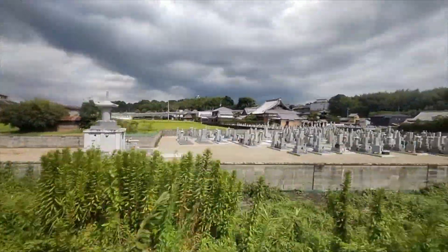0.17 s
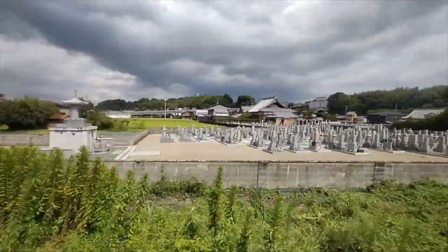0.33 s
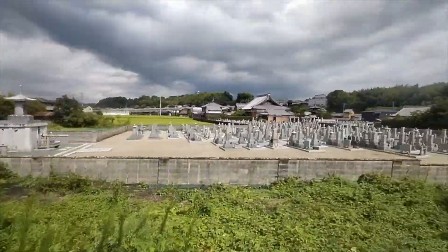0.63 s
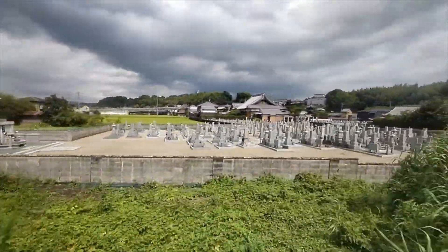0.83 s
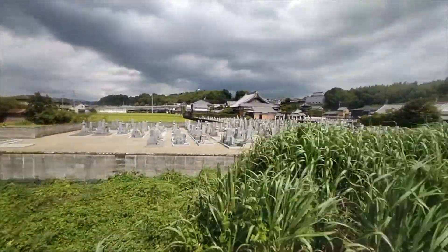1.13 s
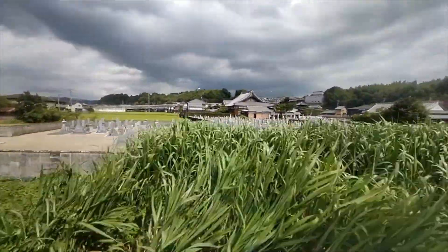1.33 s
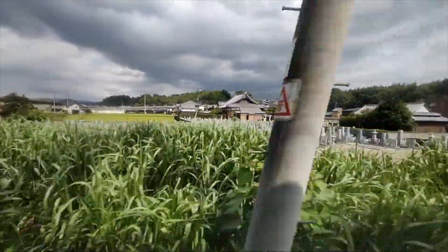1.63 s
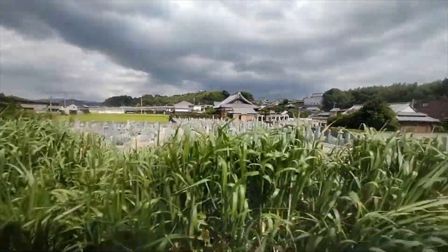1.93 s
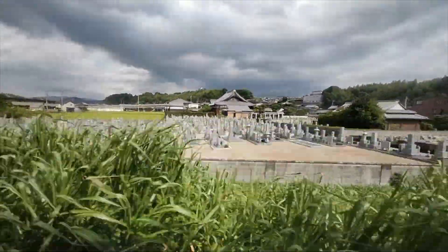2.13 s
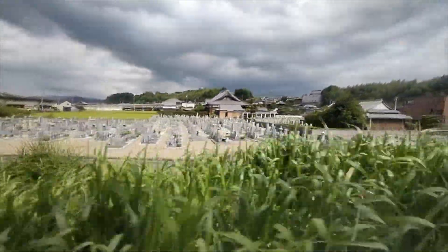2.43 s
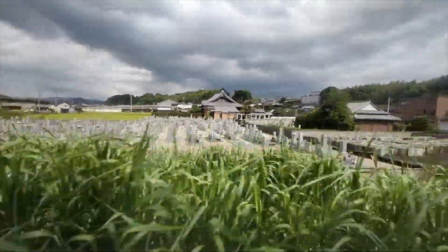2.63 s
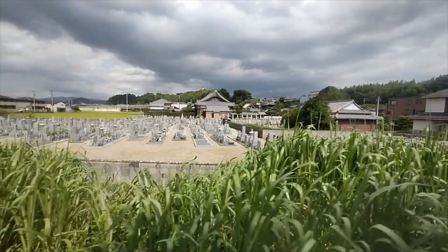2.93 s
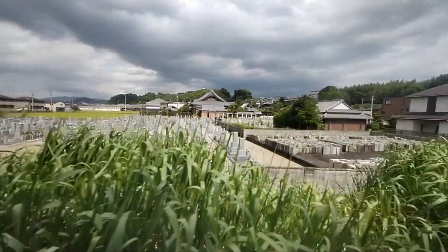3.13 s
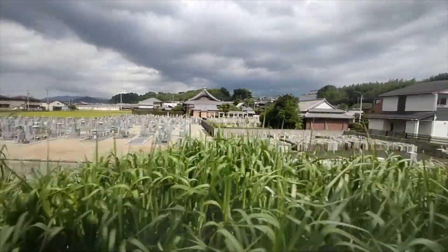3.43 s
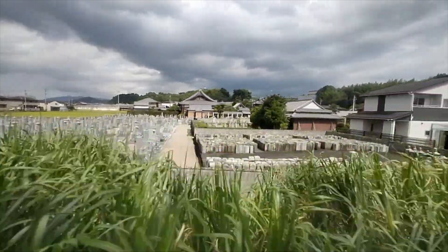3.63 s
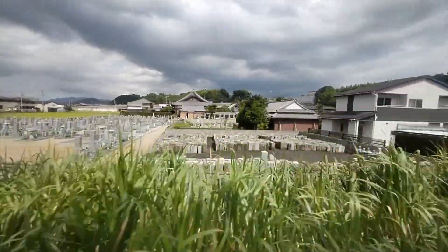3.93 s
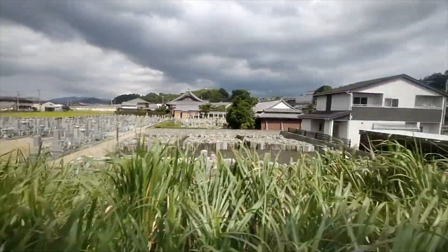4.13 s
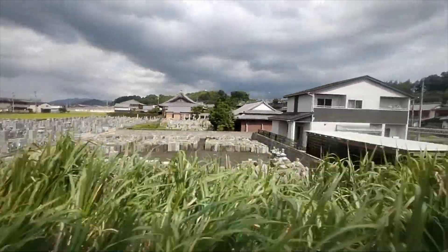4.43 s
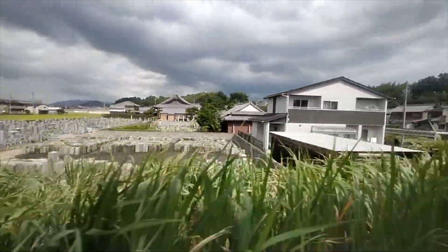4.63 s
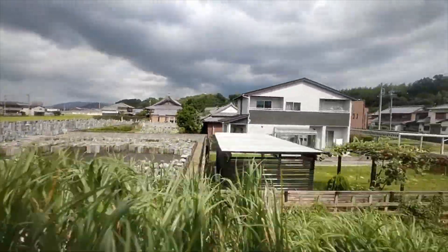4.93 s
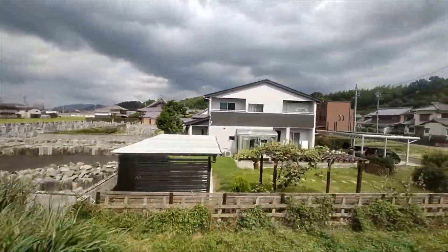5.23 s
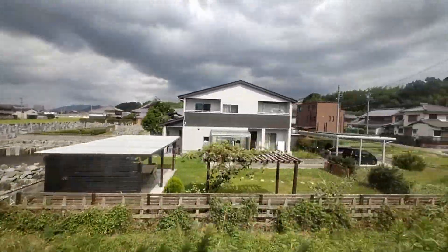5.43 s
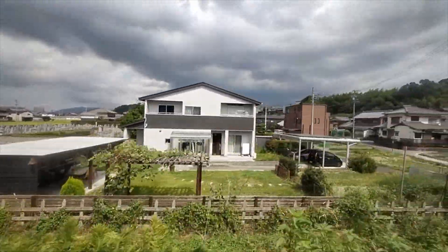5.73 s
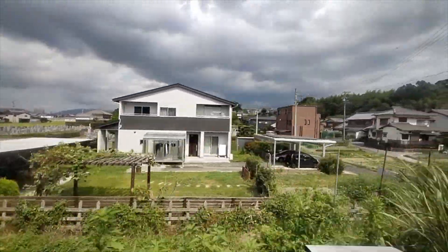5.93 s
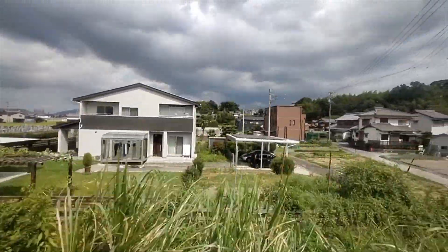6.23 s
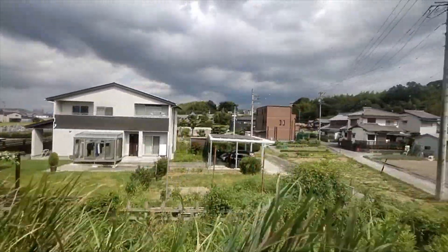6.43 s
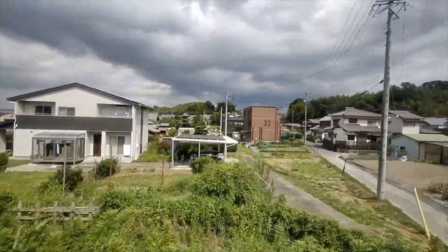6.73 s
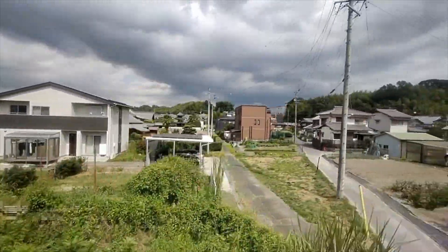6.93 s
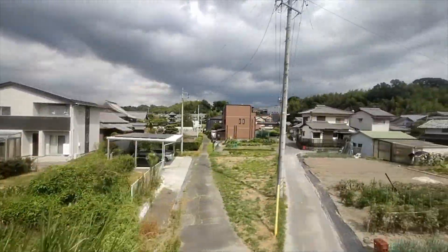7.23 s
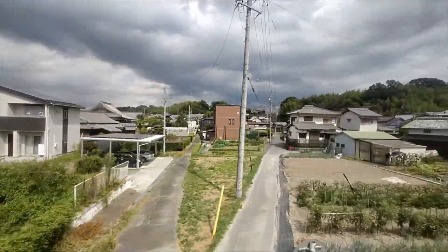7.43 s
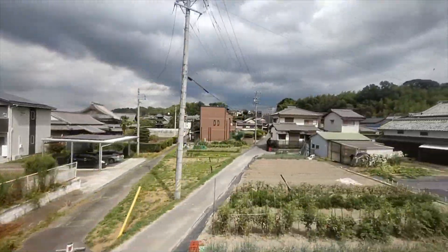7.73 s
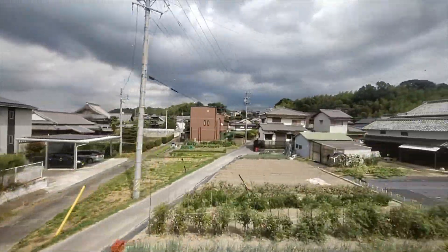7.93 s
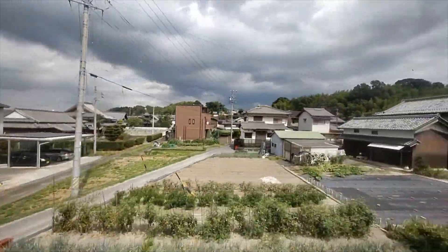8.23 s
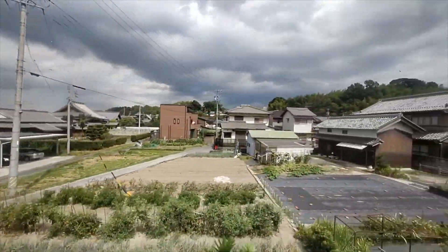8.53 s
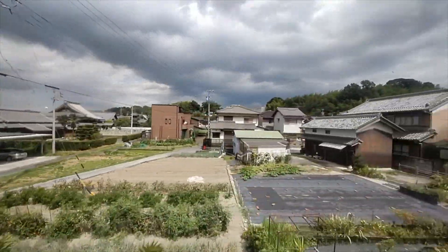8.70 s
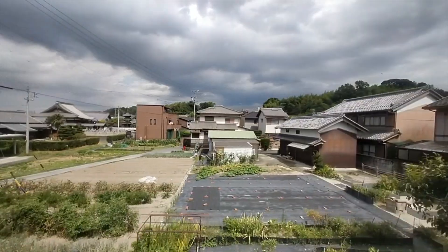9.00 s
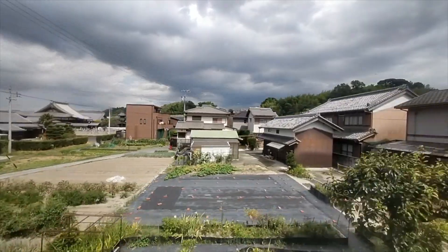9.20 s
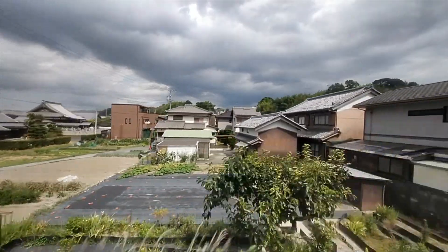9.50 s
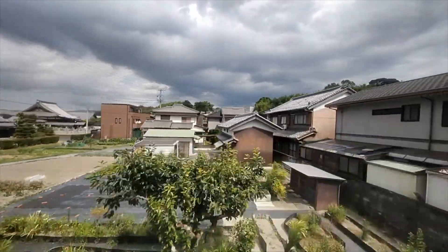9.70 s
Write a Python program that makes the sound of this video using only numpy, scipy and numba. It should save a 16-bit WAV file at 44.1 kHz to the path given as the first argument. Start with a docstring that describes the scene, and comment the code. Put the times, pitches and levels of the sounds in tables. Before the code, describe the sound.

Inside an electric train carriage slowing slightly, heard by a phone near the window. Throughout, dense low rolling rumble with a softer midrange roar swells and flickers, over a wavering hum near 50 Hz and an almost buried thin high whine. From 0.25 to 4.1 s a loose panel knocks repeatedly, deep, hollow and double-bouncing, heavy at 0.5, 1.5, 2.2 and 3.5. Body shakes and rattles crowd 0.5-0.8, 1.47 and 4.0. Metallic wheel clacks strike at 0.4, 1.2, 2.25-2.4, 3.2, then hard at 4.13-4.3. The hum is strongest near 3.8; after 4.6 the ride is calmer, with a knock at 5.2. Strong paired clacks come at 6.06 and 6.24, with knocks at 5.9-6.4, then clacks at 7.1, 7.3, 8.05, 8.2. Bright tiny ticks gather around 2.2-3.2 and 7.5-8.4, leaning left. Knocks and small clacks cluster from 8.65 to 9.4; rumble continues to the end, about 9.9.

```python
"""Inside an electric train carriage as it slows slightly

Heard by a phone near the window. Rolling noise (coloured bands plus wheel modes) fills the car over a
wavering low hum and faint inverter lines (sines). Wheels clack over rail joints (noise crashes, ringing
modes, body and panel shakes), a loose panel knocks in its frame as the body sways (bouncing pushes into
decaying modes), and trim ticks close to the phone (short bright noise)."""
import sys
import numpy as np
from scipy import signal
from scipy.fft import rfft, irfft
from scipy.io import wavfile
from scipy.ndimage import uniform_filter1d
from numba import njit

SR = 44100
rng = np.random.default_rng(int(sys.argv[2]) if len(sys.argv) > 2 else 0)


def store_wav(level_fs):
    """Save 16-bit WAV to argv[1]."""
    pcm = np.round(np.clip(np.atleast_2d(level_fs), -1, 1) * 32767)
    wavfile.write(sys.argv[1], SR, pcm.T.astype(np.int16))


N = 434826
T = np.arange(N) / SR
LEFT_LAG_S = 0.00015  # shared sound reaches the left port late

# wheel and rail modes: mode_hz, width_hz, relative_db
WHEEL = [(501, 40, -10), (953, 40, -5), (1106, 45, -9), (1340, 30, -15), (1725, 30, -23), (1893, 30, -14.5),
         (1960, 30, -17), (2218, 40, -15), (2320, 40, -17), (2630, 60, -31), (2975, 40, -28)]
# blows through the floor: start_s, crash_db, then ring_db of six mode groups, lowest first
CLACKS = [(.056, -47.5, -49, -47, -54, -56, -53, -61), (.387, -32.5, -46, -45.5, -44, -45, -37, -51),
          (0.994, -38.5, -49, -48, -59, -59, -60, -63), (1.224, -29, -44, -38, -40, -60, -65, -60),
          (2.243, -33.5, -42, -36, -53, -41, -43, -54), (2.268, -39, -45, -36, -50, -50, -39, -58),
          (2.411, -36, -37, -35, -50, -38, -38.5, -54), (3.195, -40.5, -52, -37, -46, -49, -61, -66),
          (3.342, -40.5, -50, -47, -55, -59, -59, -61), (4.133, -27.5, -28, -27, -41, -32, -37, -45),
          (4.299, -34.5, -44, -26.5, -39, -41, -50, -55), (4.316, -37, -46, -40, -58, -50, -39, -54),
          (6.064, -28, -49, -26.5, -43, -35, -40, -51), (6.239, -30.5, -35, -28, -50, -48, -43, -53),
          (6.56, -46, -40, -44, -53, -52, -46, -59), (7.096, -37.5, -49, -54, -62, -55, -44, -67),
          (7.273, -36.5, -52, -35, -56, -45, -45, -62), (8.047, -30.5, -42, -50, -32, -48, -37.5, -53),
          (8.222, -36, -41, -44, -43, -43, -41, -54), (8.922, -39, -53, -46, -40, -62, -63, -64),
          (9.004, -34.5, -38, -36, -38, -52, -47, -51), (9.012, -40.5, -39, -46, -50, -43, -42.5, -50),
          (9.046, -45.5, -39, -44, -47, -44, -46, -59), (9.196, -42, -44, -45, -49, -51, -44, -65),
          (9.511, -42, -50, -45, -52, -51, -64, -51), (9.737, -44, -51, -43, -47, -43, -64, -63)]
# body and panel shakes, rattles and scrapes:
# start_s, band_db, centre_hz, width_hz, broad_db (relative to band), tail_t60_s, rise_s
SHAKES = [(.495, -24, 860, 130, -16, 0.2, 0.015), (.495, -35, 1407, 150, -13, 0.27, 0.013),
          (2.269, -45, 1100, 800, 3, 0.49, 0.037), (3.19, -38, 890, 600, -7, 0.27, 0.027),
          (.615, -33.5, 700, 900, 9, 0.11, 0.0065), (0.661, -32, 590, 900, -11, 0.46, 0.024),
          (0.799, -26.5, 805, 130, -11, 0.18, 0.014), (1.465, -25.5, 480, 504, -11, 0.19, 0.0091),
          (1.468, -32, 1510, 900, 3, 0.77, 0.019), (1.467, -33, 1700, 90, -11, 0.37, 0.0059),
          (1.475, -30.5, 830, 120, -15, 0.19, 0.018), (.54, -33, 1300, 1000, -3, 0.27, 0.017),
          (3.204, -41, 1290, 150, 1, 0.34, 0.034), (4.021, -39, 880, 890, -13, 0.084, 0.012),
          (4.31, -23, 337, 200, -24, 0.29, 0.02), (6.085, -23.5, 323, 200, -9, 0.24, 0.019),
          (8.058, -29.5, 370, 250, -3, 0.27, 0.0077), (8.232, -26.5, 323, 120, -9.5, 0.46, 0.016),
          (3.209, -51, 1880, 500, 11, 0.26, 0.022), (3.37, -43.5, 2110, 700, -9, 0.31, 0.036),
          (3.976, -24.5, 560, 700, 3, 0.17, 0.043), (3.979, -35, 890, 1100, -5, 0.12, 0.0045),
          (4.005, -30, 475, 250, -16, 0.098, 0.007), (4.035, -32, 1030, 500, -10, 0.091, 0.0072),
          (.578, -24.5, 400, 200, -6, 0.15, .006), (.688, -28, 555, 300, -10, 0.11, 0.0052),
          (.716, -31.5, 1010, 300, -14, 0.069, 0.0047), (9.74, -42, 2200, 2200, 4, 0.069, 0.0036),
          (4.59, -34.5, 695, 900, -5, 0.56, 0.041), (4.79, -37, 550, 600, -8, 0.59, 0.074),
          (6.255, -38.5, 1100, 1200, -4, 0.33, .02), (8.922, -38.5, 1200, 1100, -7, .2, 0.0054),
          (9.196, -39.5, 1100, 900, -6, 0.17, .008), (.74, -37.5, 1100, 1100, 1, 0.39, 0.021),
          (4.99, -37, 600, 600, -6, 0.28, 0.015), (6.698, -35, 398, 300, -17, 0.18, 0.011),
          (6.82, -40, 500, 400, -12, .15, 0.012), (7.11, -36, 600, 600, -11, 0.2, .03),
          (7.289, -35.5, 520, 300, -2, 0.15, 0.017), (9.025, -39.5, 520, 300, -6, 0.16, 0.013),
          (5.346, -35, 495, 700, 4.5, 0.2, 0.009), (6.538, -31, 590, 900, -14, 0.3, 0.032)]


def undb(db):
    """Decibels to amplitude ratio."""
    return 10 ** (np.asarray(db) / 20)


def level(x, db):
    """Scale to an rms level."""
    return x * undb(db) / np.sqrt(np.mean(x ** 2))


def front(x, db):
    """Scale so that the first 45 ms have a set level, judged from the mean of both ports."""
    mono = x[:, :int(.045 * SR)].mean(axis=0)
    return x * undb(db) / np.sqrt(np.mean(mono ** 2) * 1.7)  # 1.7: power lost in the mean


def over_hz(hz, table, column=1):
    """Read a table on a log-frequency axis."""
    table = np.array(table)
    return np.interp(np.log(hz), np.log(table[:, 0]), table[:, column])


def walk(rate_hz):
    """Random levels held 1 / rate_hz s and slewed twice; spread near 1."""
    hold = int(SR / rate_hz)
    steps = np.repeat(rng.standard_normal(N // hold + 1), hold)
    return 1.38 * uniform_filter1d(uniform_filter1d(steps, hold), hold)[:N]


def resonate(x, hz, width_hz):
    """Two-pole band-pass, gain 1 at the centre."""
    return signal.lfilter(*signal.iirpeak(min(hz, .45 * SR), hz / width_hz, SR), x)


def burst(rise_s, t60_s):
    """Half-second envelope: straight rise, then an even fall in dB."""
    t = T[:SR // 2]
    return np.minimum(t / max(rise_s, .001), 1) * undb(-60 * np.maximum(t - rise_s, 0) / t60_s)


def add(out, start_s, sound):
    """Mix a short sound in at a time."""
    i = int(start_s * SR)
    out[..., i:i + sound.shape[-1]] += sound[..., :N - i]


def port_noise():
    """Spectrum of white noise at both ports: a shared part, late on the left, and a diffuse rest."""
    # microphone ports: freq_hz, shared_power (0-1), left_minus_right_db
    port_rows = [(90, .96, .1), (260, .9, .8), (520, .6, .2), (900, .15, 0), (1500, .25, .5),
                 (2200, .55, 3), (2700, .1, 2.5), (4300, .05, 3.2), (5600, .12, .2), (12000, .1, 1.6)]
    hz = np.maximum(np.arange(N // 2 + 1) * SR / N, 1)
    common, left, right = rfft(rng.standard_normal((3, N)))
    share = np.clip(over_hz(hz, port_rows), 0, 1)
    pan = undb(over_hz(hz, port_rows, column=2) / 2)
    late = common * np.exp(-2j * np.pi * hz * LEFT_LAG_S)
    mix = np.sqrt(share) * np.array([late, common]) + np.sqrt(1 - share) * np.array([left, right])
    return hz, mix * np.array([pan, 1 / pan])


def rolling(hz, spectrum, white):
    """Wheel-on-rail noise in half-octave bands that follow the swells, shudder together and flicker alone."""
    # swells, used relative to each column's mean: time_s, boom_db, rumble_db, roar_db, hiss_db
    swell_rows = [(0, -24.5, -24.5, -38.5, -55.5), (0.439, -29, -36.5, -35, -59.5),
                  (.63, -24, -31, -33, -57), (1.07, -25.5, -35.5, -41, -58),
                  (1.449, -28, -31.5, -36.5, -54.5), (2.09, -28.5, -37, -43, -60),
                  (2.41, -24.5, -28, -36.5, -57), (2.91, -30, -35.5, -40.5, -57.5),
                  (3.4, -27.5, -32.5, -35, -58), (3.92, -28.5, -31, -38, -58.5),
                  (4.31, -28, -34.5, -40.5, -58.5), (4.849, -35.5, -39.5, -44.5, -58),
                  (5.4, -28.5, -35.5, -37.5, -60.5), (5.9, -30, -40, -40.5, -60.5),
                  (6.31, -30, -37.5, -41.5, -59.5), (7.1, -29.5, -38.5, -42, -60.5),
                  (7.749, -35, -34, -40.5, -60), (8.35, -27.5, -36.5, -41.5, -58.5),
                  (8.85, -34.5, -37.5, -41, -60.5), (9.15, -27, -31.5, -40, -60),
                  (9.548, -30, -33, -41, -60.5), (9.86, -34, -36, -42, -58)]
    # centres of boom, rumble, roar, hiss and top: freq_hz
    layer_hz = [70, 260, 1200, 5000, 9000]
    # spectrum shape: freq_hz, density_db (per Hz)
    roll_colour = [(12, -22.5), (20, 5), (31, -1), (45, -0.5), (65, 1), (246, -11.5), (317, -15),
                   (495, -14), (553, -18), (889, -20.5), (1210, -27), (2300, -34.5), (3900, -47),
                   (5300, -46), (7010, -58), (10100, -64.5), (15700, -64.5)]
    # steady ring of the upper wheel modes, played 4 dB lower and flickering: time_s, level_db
    ring_rows = [(0, -44.5), (.6, -48), (1.1, -55), (1.55, -53), (2.1, -54.5), (2.5, -50), (3.3, -49),
                 (4.3, -48), (5.1, -51), (5.8, -52), (6.5, -50.5), (7.2, -44.5), (7.9, -46), (8.6, -47),
                 (9.3, -47), (9.86, -60)]
    jolt_lift_db = [1.67, 2.9, 1.47, 0.68]  # boom, rumble, roar, hiss
    lowest_hz = 22

    time_s, *columns = np.transpose(swell_rows)
    stir = jolts()
    swell_db = [np.interp(T, time_s, c - np.mean(c)) + lift * stir for c, lift in zip(columns, jolt_lift_db)]
    swell_db.append(1.2 * swell_db[3])  # the top follows the hiss
    swell_db = np.array(swell_db)

    coloured = spectrum * undb(over_hz(hz, roll_colour))
    shudder = walk(9.1)
    half_octave = 2 * np.log2(hz / lowest_hz)
    layer_steps = 2 * np.log2(np.array(layer_hz) / lowest_hz)
    noise = 0
    for k in range(20):
        band = irfft(coloured * np.clip(1 - abs(half_octave - k), 0, 1), N)
        place = np.interp(k, layer_steps, np.arange(5))
        weights = np.clip(1 - abs(place - np.arange(5)), 0, 1)
        flicker_db = (0.88 * shudder + 0.73 * walk(12)) * (1.5 - 0.032 * k)
        noise = noise + band * undb(weights @ swell_db + flicker_db)

    low_ring = level(wheel(white, WHEEL[:4]), -48.5) * undb(swell_db[2] + 2.5 * walk(5.5))
    ring_db = np.interp(T, *np.transpose(ring_rows)) - 4 + 2.2 * walk(9.7)
    high_ring = level(wheel(white, WHEEL[4:]), 0) * undb(ring_db)
    return level(noise, -23.5) + low_ring + high_ring


def wheel(x, modes):
    """The ringing modes of wheel and rail driven by noise, each a narrow and a wide resonator in series."""
    return sum(undb(db) * resonate(resonate(x, hz, width), hz, 6 * width) for hz, width, db in modes)


def jolts():
    """How much the blows and shakes have stirred the body, 0-1: each swells and dies away."""
    top_s, full_db = 0.12, -24  # time to the top, blow level that nearly saturates
    start_s, db = np.array([row[:2] for row in CLACKS + SHAKES]).T[:, :, None]
    coarse_t = T[::64]
    age = np.maximum(coarse_t - start_s, 0) / top_s
    stir = np.sum(undb(db - full_db) * age * np.exp(1 - age), axis=0)
    return np.interp(T, coarse_t, np.tanh(stir))


def clacks(hz, spectrum):
    """Blows come up through the floor: a broad crash and the wheel's ring; body and panels shake and rattle."""
    # crash spectrum shape: freq_hz, density_db (per Hz)
    crash_colour = [(300, -19.5), (450, 7), (1000, -2), (2000, -13), (3200, -18), (4000, -28.5),
                    (5300, -27), (6800, -38), (9000, -59.5)]
    crash_t60_s, crack_t60_s, crack_db = 0.95, .13, 3  # the crack is the short, hard front
    loose_per_s, loose_db, loose_spread_db, loose_t60_s = 24, -47.5, 2.2, .16  # loose_db: least, at 1 kHz

    floor = level(irfft(spectrum * undb(over_hz(hz, crash_colour)), N), 0)
    floor = floor * undb(1.8 * walk(45))  # dies away raggedly
    grit = level(irfft(spectrum * undb(np.minimum(-18 * np.log2(hz / 3300), 0)), N), 0)
    out = np.zeros((2, N))

    def piece(noise, start_s):
        """Half a second of noise from a time on."""
        return np.roll(noise, -int(start_s * SR), axis=1)[:, :SR // 2]

    crash_shape = (burst(0.0095, crash_t60_s) + undb(crack_db) * burst(.0055, crack_t60_s)) / 2
    for (s, db, *group_db), chance in zip(CLACKS, rng.standard_normal((len(CLACKS), len(WHEEL), 4))):
        add(out, s, front(piece(floor, s), db) * crash_shape)
        add(out, s, wheel_ring(group_db, chance))

    for place, pitch, size in rng.random((int(loose_per_s * N / SR), 3)):
        s, centre_hz = place * (N - 1) / SR, 500 * 3.3 ** pitch
        db = loose_db - 1.9 * np.log2(centre_hz / 1000) - loose_spread_db * np.log(1 - size)
        rattle = resonate(piece(floor, s), centre_hz, 0.25 * centre_hz)
        add(out, s, level(rattle, db) * burst(0.0087, loose_t60_s))

    for s, db, centre_hz, width_hz, broad_db, t60_s, rise_s in SHAKES:
        band = resonate(resonate(piece(grit, s), centre_hz, width_hz), centre_hz, width_hz)
        broad = front(piece(floor, s), db + broad_db)
        add(out, s, (front(band, db) + broad) * burst(rise_s, t60_s))
    return out


def wheel_ring(group_db, chance):
    """One blow rings the wheel's modes, each a little detuned, with its own phase lag between the ports."""
    # one entry per wheel mode: group_index
    mode_group = [0, 1, 1, 2, 3, 3, 3, 4, 4, 5, 5]
    rise_s, scatter_db, stretch = .0055, 1.5, 1.6
    t, ring = T[:SR // 4], 0
    group_power = np.bincount(mode_group, undb(np.array(WHEEL)[:, 2]) ** 2)
    for (hz, width_hz, db), g, (drift, size, turn, lean) in zip(WHEEL, mode_group, chance):
        lag = .6 * lean * np.array([[1], [-1]])
        phase = 2 * np.pi * (hz * (1 + .006 * drift) * t + turn) + lag
        gain = undb(group_db[g] + db + scatter_db * size) * np.sqrt(2 / group_power[g])
        t60_s = stretch * np.log(1000) / (np.pi * width_hz)
        ring = ring + gain * np.sin(phase) * burst(rise_s, t60_s)[:len(t)]
    return ring


def panel():
    """A knock is a soft push that bounces in the frame, rings the panel's modes and comes back weaker."""
    # knocks: start_s, peak_db, boom_db, middle_db, brightness_db, chatter_s, fade_per_bounce_db
    knock_rows = [(0.257, -11.5, 12.5, -1, -19, 0.036, 4.5), (0.502, -1.5, 7.5, -5, -7, 0.051, 0.9),
                  (0.792, -5, 18.5, 1.5, -11.5, 0.058, 2), (1.057, -10, 4, 1, -13, 0.032, 1.5),
                  (1.224, -7, 10.5, 0.5, -15.5, 0.06, 3), (1.466, -8.5, 18, 3, -8, 0.06, -1.5),
                  (1.663, -7, 11.5, 1, -11.5, 0.033, 0), (1.915, -10, 8, -4, -34, 0.033, 0.5),
                  (2.204, -5.5, 13.5, 4, -16, 0.046, -1), (2.35, -6, 15.5, 1, -5, 0.045, -0.3),
                  (2.566, -13, -3, -1.5, -33, 0.016, -8), (2.652, -16, -6, -10, -37, 0.018, 1),
                  (3.151, -8, 18, 1, -8, 0.11, 1), (3.279, -12, 16, 6, -9, 0.022, 1),
                  (3.476, -4.5, 10, -1.7, -18.5, 0.047, 0.7), (3.9, -12.5, 1, 0, -14, 0.04, -0.5),
                  (4.088, -7, 3, -4, -35, 0.03, -1.5), (5.192, -5.5, 8, 1.5, -22.5, 0.04, 2),
                  (5.901, -8, 14, 0.5, -19.5, 0.033, 1), (6.186, -13, 12, -1, -14.5, 0.037, 2.5),
                  (6.266, -14, 11, 4, -17, .035, 0.5), (6.397, -7, 11, 1, -22, 0.039, 1.2),
                  (7.493, -6.5, 6.5, -5, -43, 0.044, 7.5), (7.735, -8, 9, -2.5, -32, 0.028, 5),
                  (8.658, -6.5, 7.5, 5, -11, 0.03, 2), (8.92, -5.5, 8.5, 2.2, -12, 0.041, 0),
                  (9.109, -14, 3, -2, -25, 0.034, 6), (9.201, -6.5, 6, 4, -17.5, 0.033, 1),
                  (9.407, -6, 3, -3.5, -17.5, 0.03, 2)]
    # panel modes: mode_hz, relative_db, t60_s
    panel_modes = [(62.4, -24.5, 0.14), (90.1, -8, .13), (124.4, -8.5, 0.1), (204.1, 0, 0.26),
                   (225.8, 3.5, .11), (274.4, 2, 0.22), (300.7, -1, 0.1), (357.5, 13, .12),
                   (394.2, 11, 0.12), (455, 4, 0.05), (540, 0, 0.053)]
    push_s, bounce_s, rebound_s, swell_s, rebound_db = 0.0025, .0128, 0.077, 0.00481, -14

    out, t, bounce = np.zeros((2, N)), T[:SR // 3], np.arange(8)
    push = np.hanning(int(push_s * SR))
    chances = rng.standard_normal((len(knock_rows), 4, len(panel_modes)))
    for knock, (drift, lean, late, size) in zip(knock_rows, chances):
        s, peak_db, boom_db, middle_db, bright_db, chatter_s, fade_db = knock
        ring = 0
        for (hz, mode_db, t60_s), d, pan in zip(panel_modes, drift, lean):
            gain_db = mode_db + boom_db * (hz < 150) + middle_db * (260 < hz < 330) + bright_db * (hz > 330)
            ports = undb(pan * hz / 170 * np.array([[1], [-1]]))  # higher modes differ more between ports
            mode = ports * undb(gain_db - 60 * t / t60_s) * np.sin(2 * np.pi * hz * (1 + 0.014 * d) * t)
            ring = -ring + mode  # neighbouring modes swing to opposite sides

        pushes = np.zeros(len(t))
        at = np.abs(bounce * (bounce_s + .00012 * late[:8]) * SR).astype(int)
        present = np.clip(1 + chatter_s / bounce_s - bounce, 0, 1)
        pushes[at] = present * undb(1.7 * size[:8] - fade_db * bounce)
        ring = signal.fftconvolve(ring, np.convolve(pushes, push)[None])[:, :len(t)]
        ring = -ring * undb(peak_db) / np.abs(ring).max()
        add(out, s - swell_s, ring)  # the ring takes a moment to swell
        add(out, s + rebound_s, undb(rebound_db) * ring)
    return np.array([np.roll(out[0], int(LEFT_LAG_S * SR)), out[1]])


def ticks():
    """Tiny bright snaps of trim, each with a lower-pitched rattle: band-passed noise bursts."""
    # ticks, levels ahead of envelope and pan: start_s, snap_db, centre_hz, width_hz, snap_t60_s, rattle_db
    tick_rows = [(1.8517, -67, 15400, 3000, .04, -63), (2.2433, -57, 15400, 3000, .04, -54.5),
                 (2.5461, -57, 13000, 6000, .02, -66), (2.6733, -64, 13000, 6000, .025, -58),
                 (2.83, -66, 15100, 700, .12, -73), (2.9951, -60, 14800, 5000, .05, -57),
                 (3.2, -64, 14100, 4000, .05, -60), (5.019, -64, 11500, 3500, .05, -55.5),
                 (7.555, -67, 12100, 900, .4, -72), (7.5677, -55, 15300, 3000, .07, -62),
                 (7.7243, -65, 15200, 900, .04, -71), (7.7448, -58, 15100, 2000, .05, -70),
                 (8.2242, -56, 15000, 2500, .04, -65), (8.2666, -55, 14800, 4000, .04, -66),
                 (8.3075, -63, 14000, 3500, .03, -69), (8.3494, -66, 14200, 3500, .025, -72),
                 (8.4148, -59, 15300, 2500, .03, -78), (9.2976, -59, 13400, 4000, .05, -53.5),
                 (9.5107, -70, 13000, 5000, .05, -54.5)]
    rattle_hz, rattle_width_hz, rattle_t60_s = 4900, 2600, 0.27
    left_minus_right_db = 7.5
    pan = undb(np.array([[left_minus_right_db], [-left_minus_right_db]]) / 2)
    out = np.zeros((2, N))
    for row, grit in zip(tick_rows, rng.standard_normal((len(tick_rows), 2, SR // 2))):
        s, db, hz, width_hz, t60_s, rattle_db = row
        grit = grit + 0.89 * grit[::-1]  # mostly alike at both ports
        snap = resonate(resonate(grit, hz, width_hz), hz, width_hz)
        rattle = resonate(resonate(grit, rattle_hz, rattle_width_hz), rattle_hz, rattle_width_hz)
        snap = level(snap, db) * burst(0.0015, t60_s)
        rattle = level(rattle, rattle_db) * burst(0.0043, rattle_t60_s)
        add(out, s - .003, (snap + rattle) * pan)
    return out


def tones():
    """A low hum that wavers in pitch and level, and the thin sine lines of the inverter."""
    # hum: time_s, rms_db
    hum_rows = [(0, -33), (1, -36), (1.5, -30), (2.2, -32), (2.8, -27.5), (3.8, -24.5), (4.6, -27),
                (5.4, -30), (5.8, -28.5), (6.8, -31), (7.6, -38), (8.8, -41), (9.4, -34), (9.86, -33)]
    # inverter lines: line_hz, rms_db
    whine_lines = [(4980, -81), (5228, -77), (5328, -80), (5404, -79), (5454, -78), (5578, -81),
                   (5703, -80)]
    hum_hz = 49
    wobble = np.cumsum(0.39 * walk(2.01)) / SR  # cycles
    hum_db = np.interp(T, *np.transpose(hum_rows)) + 1.2 * walk(4)
    hum = np.sqrt(2) * undb(hum_db) * np.sin(2 * np.pi * (hum_hz * T + wobble))
    whine = 0
    start_phase = 2 * np.pi * rng.random((len(whine_lines), 2, 1))
    for (hz, db), phase in zip(whine_lines, start_phase):
        whine = whine + np.sqrt(2) * undb(db + 1.1 * walk(1.8)) * np.sin(2 * np.pi * hz * T + phase)
    return hum + whine


def scene():
    """Sum of all sources at the two ports."""
    hz, rails = port_noise()
    hz, blows = port_noise()
    return rolling(hz, rails, irfft(blows, N)) + tones() + panel() + clacks(hz, blows) + ticks()


@njit
def follow(x, attack, release):
    """Peak follower, quick up and slow down."""
    out, e = np.empty(len(x)), 0.
    for i in range(len(x)):
        e += (x[i] - e) * (attack if x[i] > e else release)
        out[i] = e
    return out


def record(dry):
    """The phone drops the deepest bass, its port rings, loud knocks are turned down, peaks rounded, top cut."""
    # port resonance: centre_hz, width_hz, added_db (halved as amplitude)
    port_peak = (5410, 680, 4.3)
    attack_s, release_s, knee_db, slope = 0.018, .08, -14, .32
    top_hz, ceiling = 15780, .9

    dry = signal.sosfilt(signal.butter(2, 18, "high", fs=SR, output="sos"), dry)
    dry = dry + undb(port_peak[2]) / 2 * resonate(dry, *port_peak[:2])
    loud = follow(np.abs(dry).max(axis=0), 1 / (attack_s * SR), 1 / (release_s * SR))
    gain = np.minimum(undb(knee_db) / (loud + 1e-9), 1) ** slope
    rounded = ceiling * np.tanh(dry * gain / ceiling)
    return signal.sosfilt(signal.ellip(10, .2, 80, top_hz, fs=SR, output="sos"), rounded)


dry = scene()
out = record(dry)
store_wav(out)
```